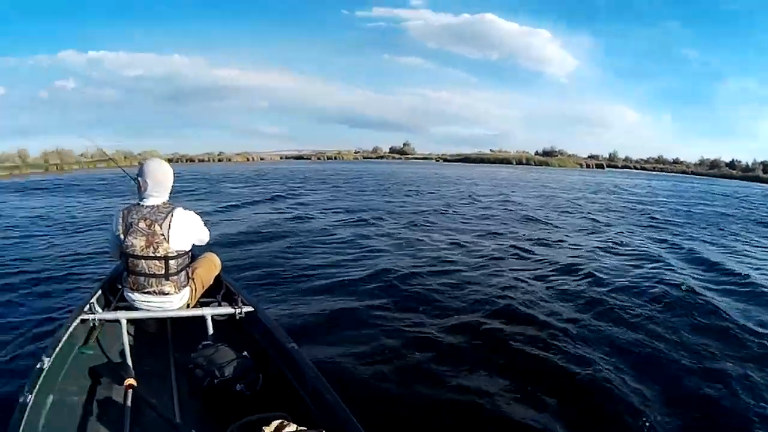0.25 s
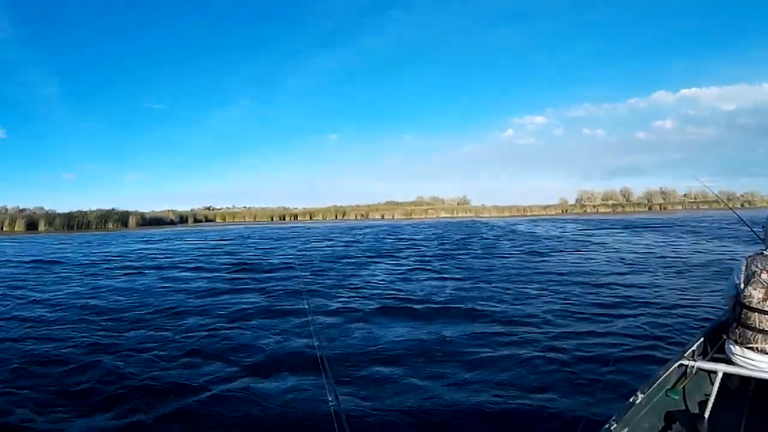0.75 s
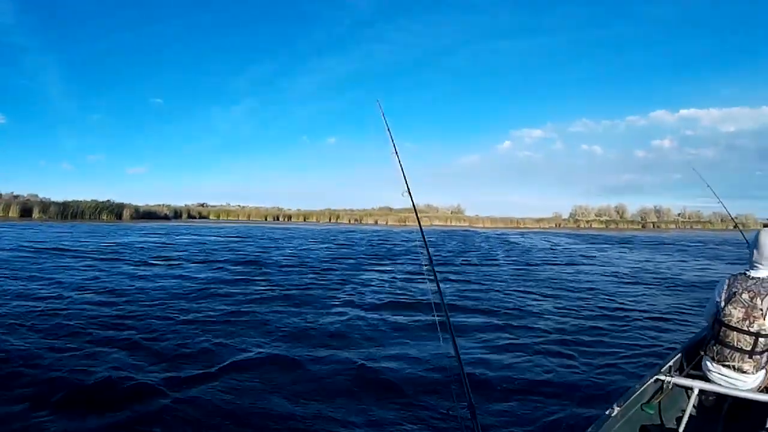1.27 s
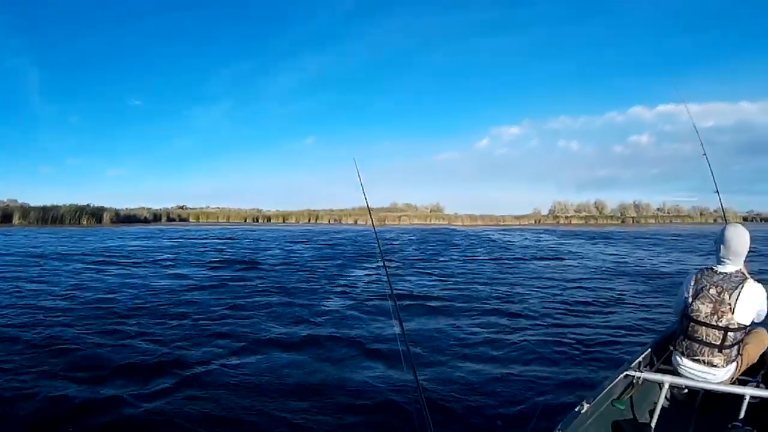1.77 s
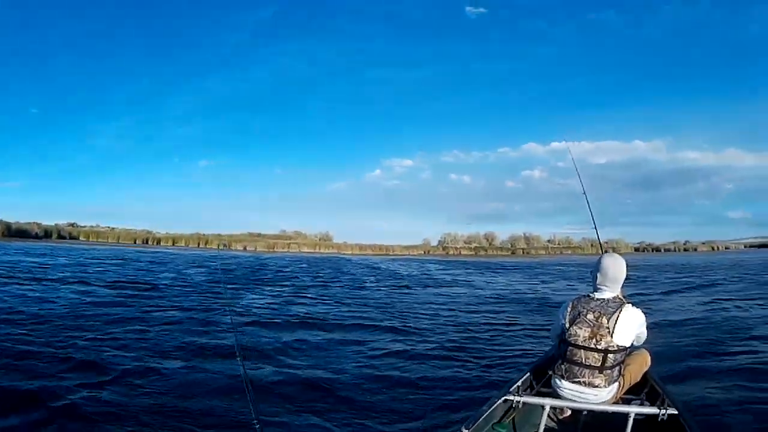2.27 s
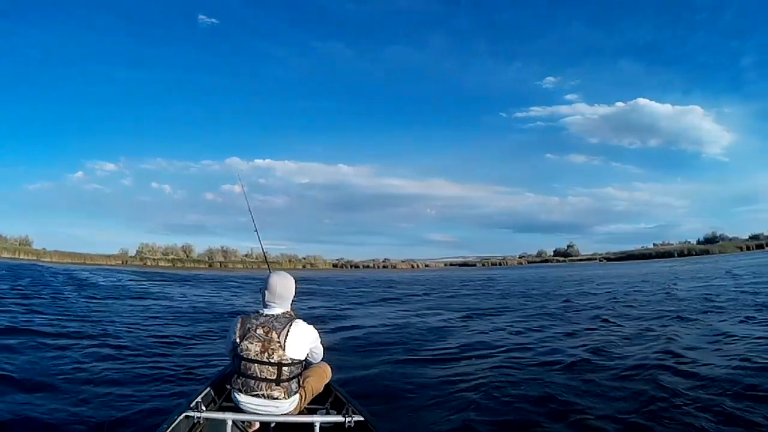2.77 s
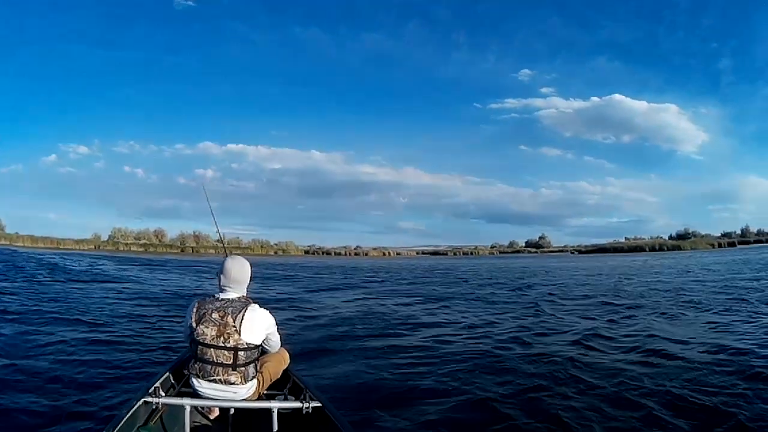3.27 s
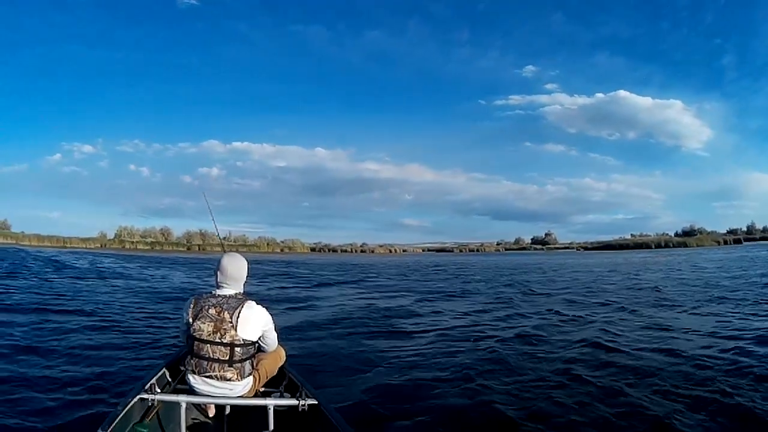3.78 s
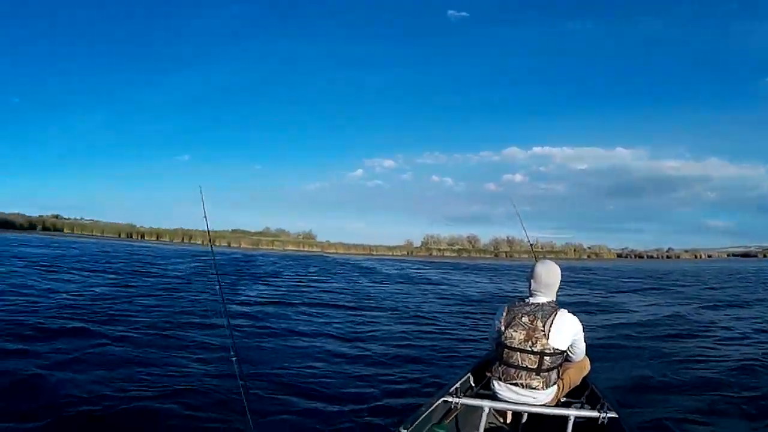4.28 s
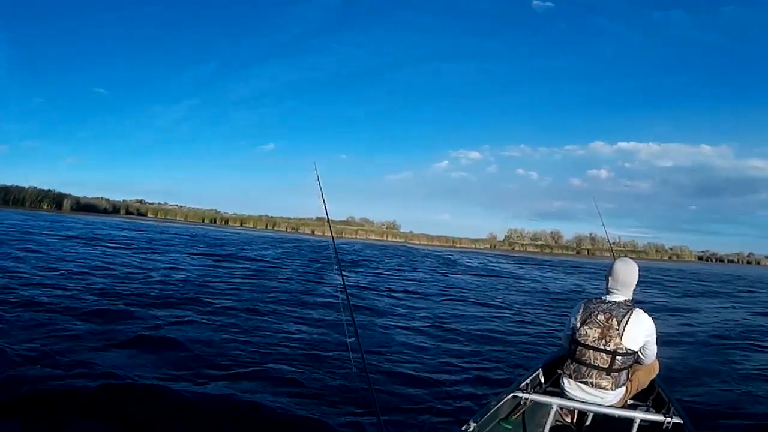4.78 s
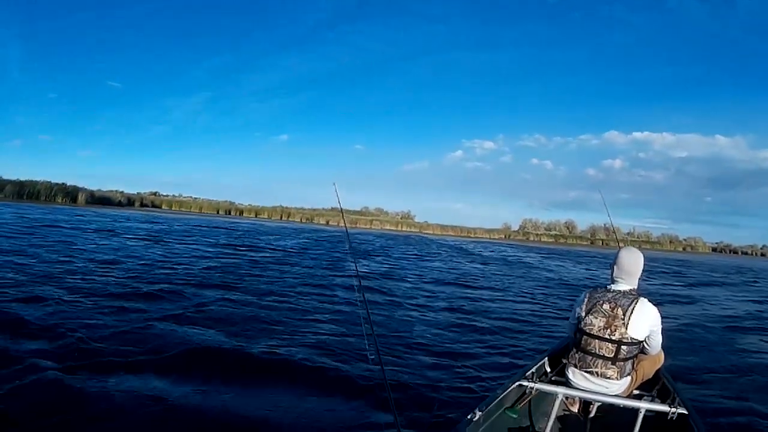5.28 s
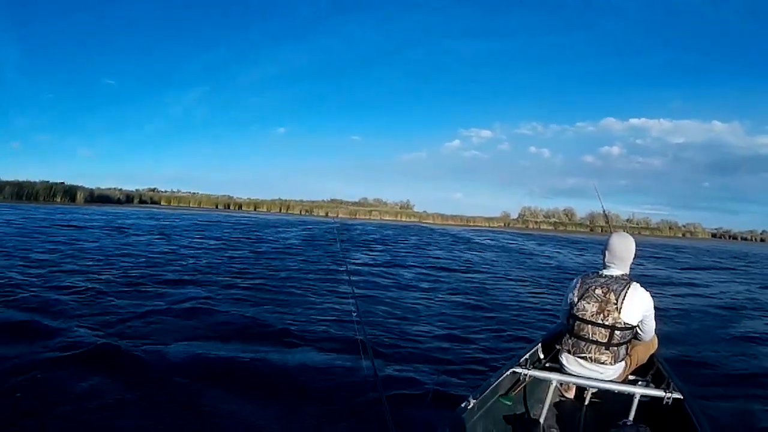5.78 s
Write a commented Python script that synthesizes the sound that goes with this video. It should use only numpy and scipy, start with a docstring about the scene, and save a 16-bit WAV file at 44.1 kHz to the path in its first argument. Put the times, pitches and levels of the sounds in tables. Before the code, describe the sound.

Close, mono wind noise on an exposed microphone over a lake. Mild airy rush first, then deep uneven buffeting with brief tearing spits on the strongest hits. About two seconds of much quieter soft wash and faint rumble follow, with one small puff early on. Another loud rush then arrives, fluttering and crackling before weakening slightly, with no echo.

```python
"""Wind on a body-worn camera in a small boat on open water. After a weak start a long gust hits the
microphone port: eddies thump and flutter on it (pulses, noise in octave layers) and the strongest
tear into crackle (decaying noise spits). In the lull a low rumble and the smoother rush of air and
choppy water (filtered random kicks) remain. A second long gust follows, easing toward the end.
Faint hiss runs throughout; the recorder rounds the highest peaks."""
import sys
import numpy as np
from scipy import signal
from scipy.fft import rfft, irfft
from scipy.io import wavfile
from scipy.ndimage import uniform_filter1d

SR = 44100
rng = np.random.default_rng(int(sys.argv[2]) if len(sys.argv) > 2 else 0)


def digitize_waveform(pressure):
    """Quantize a signal to 16-bit integers and store it at the path in sys.argv[1].

    Rows of a 2-D input are taken as channels; values are limited to [-1, 1].
    """
    field = np.atleast_2d(pressure).T
    bounded = np.clip(field, -1, 1)
    quanta = np.round(bounded * 32767).astype(np.int16)
    wavfile.write(sys.argv[1], SR, quanta)


N = 266364
TIME = np.arange(N) / SR
FREQ = np.fft.rfftfreq(N, 1 / SR) + 1e-3  # offset keeps log and division finite at 0 Hz
FULL_GUST_DB = -18  # wind strength that counts as a full gust


def undb(db):
    """Decibels to gain."""
    return 10 ** (np.asarray(db) / 20)


def curves(table):
    """Each value column of a table, interpolated over time."""
    t_s, *columns = np.transpose(table)
    return [np.interp(TIME, t_s, column) for column in columns]


def unit(x):
    """Scale to rms 1."""
    return x / np.sqrt(np.mean(x ** 2))


def colour(x, points):
    """Filter by a spectrum of (Hz, relative dB) points; white noise keeps its rms."""
    hz, db = np.transpose(points)
    gain = undb(np.interp(np.log(FREQ), np.log(hz), db))
    return irfft(rfft(x) * unit(gain), N)


def walk(rate_hz):
    """Random levels, one per 1 / rate_hz, joined by linear slews; rms 1."""
    hold = max(int(SR / rate_hz), 2)
    levels = rng.standard_normal(N)[:N // hold + 1]
    return unit(uniform_filter1d(np.repeat(levels, hold), hold)[:N])


def eddies(per_s):
    """Pressure kicks of random size and sign at random moments; rms 1."""
    struck = rng.random(N) < per_s / SR
    return unit(rng.standard_normal(N) * struck)


# wind strength at the port, two gusts and a lull: t/s, level/dB (relative)
GUST_STRENGTH = [(0, -29), (0.38, -32), (0.62, -19), (0.8, -16.5), (1.15, -15.5), (1.38, -18), (1.62, -18),
                 (1.92, -26), (2.25, -32), (2.6, -35.5), (3.3, -36), (3.9, -36.5), (4.26, -29.5),
                 (4.5, -21.5), (4.95, -18), (5.2, -16), (5.55, -19.5), (5.78, -21), (6.04, -22)]
# short puffs (+) and gaps (-): t/s at the middle, length/s, lift/dB
WIND_PUFFS = [(1.348, 0.071, 2.5), (1.714, 0.095, -2.5), (1.803, 0.14, 4.5), (2.39, 0.21, 4.5),
              (4.659, 0.16, 5), (5.249, 0.03, -11.5), (5.336, 0.06, 3.5), (5.914, 0.23, 2)]


def wind(surge_db=1.07, surges_per_s=9):
    """Wind strength in dB: slow gusts, puffs that swell and fade on them, random surges."""
    gust_db, = curves(GUST_STRENGTH)
    for mid_s, length_s, lift_db in WIND_PUFFS:
        phase = np.clip((TIME - mid_s) / length_s, -.5, .5)
        gust_db = gust_db + lift_db * np.cos(np.pi * phase)
    return gust_db + surge_db * walk(surges_per_s)


# drive of the largest eddies: t/s, level/dB (relative)
RUMBLE_DRIVE = [(0, -33.5), (0.35, -33), (0.75, -21.5), (1.2, -19.5), (1.8, -27), (2.1, -31.5), (2.7, -32),
                (3.1, -39), (3.8, -30.5), (4.45, -28.5), (5.2, -20), (6.04, -27)]
# pressure spectrum of a full gust: f/Hz, level/dB (per Hz, relative)
GUST_SPECTRUM = [(15, -31), (26, -9.5), (40, -1.5), (80, 0.5), (170, -0.5), (330, -3), (600, -10),
                 (1100, -18), (1550, -21), (2100, -35), (2700, -38.5), (3300, -58.5), (4300, -61.5),
                 (7000, -78)]


def buffet(gust_db, level_db=2.5, deep_db=5, steepen=0.097, flutter_db=1.16, burst_db=1.5,
           cascade=0.19, own_db=0.87):
    """Eddies of all sizes press on the port; small ones burst and grow fastest with the wind."""
    rumble_db, = curves(RUMBLE_DRIVE)
    pressure = rfft(colour(eddies(per_s=6000), GUST_SPECTRUM))
    churn_db = flutter_db * walk(55) + burst_db * walk(170)
    out = 0
    for octave in range(-4, 7):
        # triangular bands an octave apart, counted from 300 Hz
        place = np.log2(FREQ / 300) - octave
        layer = irfft(pressure * np.clip(1 - abs(place), 0, 1), N)
        # the largest eddies roll on by themselves, the smallest follow the gust steeply
        large = np.clip(-octave / 2, 0, 1)
        small = np.clip(octave, 0, 3)
        drive_db = gust_db + large * (rumble_db - gust_db + deep_db)
        drive_db = drive_db + steepen * small * (gust_db - FULL_GUST_DB)
        churn_share = 1 - large + cascade * small
        bursts = unit(undb(churn_db * churn_share + own_db * walk(30)))
        out = out + layer * undb(drive_db) * bursts
    return out * undb(level_db)


# strongest single eddies on the port: t/s, peak level/dB (relative), nominal f/Hz
THUMP_EVENTS = [(0.431, -4.5, 153), (0.451, -7, 130), (0.534, -7.5, 135), (0.582, 2.5, 157),
                (1.001, 4, 133), (1.106, 0, 132), (1.14, -1, 369), (1.249, -2.5, 191), (1.731, -2.5, 233),
                (1.763, 3.5, 280), (1.79, 2, 237), (2.378, -14, 145), (5.26, 0, 152), (5.323, 1, 157),
                (5.33, 4.5, 345), (5.396, 0.5, 202), (5.42, 1, 222)]


def thumps(level_db=-5.0, sharpness=3.27):
    """A large eddy sucks briefly at the diaphragm, with a push of pressure on either side."""
    out = np.zeros(N)
    for t_s, peak_db, hz in THUMP_EVENTS:
        near = abs(TIME - t_s) < 2 / hz
        distance_sq = (sharpness * hz * (TIME[near] - t_s)) ** 2
        out[near] -= undb(peak_db + level_db) * (1 - 2 * distance_sq) * np.exp(-distance_sq)
    return out


# loudest spits of flow tearing off the port edge: t/s, onset level/dB (relative)
SPIT_EVENTS = [(0.992, -28), (1.0415, -18), (1.072, -18.5), (1.129, -23), (1.1978, -16.5), (1.209, -19),
               (1.354, -23), (1.4052, -28), (1.8196, -22), (2.4085, -25.5), (4.9018, -22), (5.001, -26),
               (5.153, -22), (5.1948, -21), (5.2608, -21.5), (5.3222, -16), (5.463, -19), (5.6032, -30),
               (5.8695, -20.5), (5.919, -26)]
# crackle spectrum: f/Hz, level/dB (per Hz, relative)
CRACKLE_SPECTRUM = [(300, -3), (1500, 9), (2600, 2.5), (3300, -2), (4300, -4.5), (5600, -15.5),
                    (7000, -22.5), (9000, -32), (15000, -37.5)]


def crackle(gust_db, spit_db=-4, decay_s=0.0019, spray_db=-43.0, spread_db=7, cluster_db=3, growth=1.8):
    """Millisecond spits of fine turbulence over a spray of small ones that rises steeply with the gust."""
    spits = np.zeros(N)
    for t_s, onset_db in SPIT_EVENTS:
        spits[int(t_s * SR)] += undb(onset_db + spit_db)
    spits = signal.lfilter([1], [1, -np.exp(-1 / (decay_s * SR))], spits)
    grains_db = spread_db * np.minimum(walk(500), 2.5)
    spray = unit(undb(grains_db + cluster_db * walk(45)))
    over_full_db = np.minimum(gust_db - FULL_GUST_DB, 1)  # capped 1 dB above a full gust
    spray = spray * undb(spray_db + growth * over_full_db)
    return colour((spits + spray) * rng.standard_normal(N), CRACKLE_SPECTRUM)


# air and chop around the boat: t/s, level/dB (relative)
RUSH_LEVEL = [(0, -41), (0.17, -41), (0.3, -46.5), (0.5, -49.5), (0.75, -59.5), (1.8, -65), (2.02, -51),
              (2.27, -56), (2.64, -48.5), (2.8, -44.5), (2.92, -50.5), (3.4, -49.5), (3.62, -46),
              (3.88, -49), (4.02, -44.5), (4.25, -50), (4.7, -46.5), (5.2, -61), (6.04, -54)]
# rush spectrum: f/Hz, level/dB (per Hz, relative)
RUSH_SPECTRUM = [(100, -32), (400, -8), (900, -5), (1250, -10.5), (1650, -9), (2150, -16), (2700, -18),
                 (3300, -29.5), (4400, -27.5), (5700, -40.5), (6700, -42), (8000, -55.5), (15000, -70)]


def rush(level_db=12, flicker_db=1.16, grain_db=1.54, brighten=0.25, treble_hz=3000, usual_db=-50):
    """A smooth wash of air and small waves, slightly grainy and brighter as it swells."""
    rush_db, = curves(RUSH_LEVEL)
    wash = colour(eddies(per_s=9000), RUSH_SPECTRUM)
    treble = irfft(rfft(wash) / (1 + (treble_hz / FREQ) ** 2), N)
    wash = wash + treble * (undb(brighten * (rush_db - usual_db)) - 1)
    unsteady_db = flicker_db * walk(22) + grain_db * walk(150)
    return wash * undb(rush_db + level_db + unsteady_db)


def hiss(level_db=-64.5):
    """The microphone's own steady noise, tilted toward the treble."""
    noise = colour(rng.standard_normal(N), [(1000, -7.5), (8000, 3.5), (15000, 0.5)])
    return undb(level_db) * noise


def scene():
    """Wind on the port over the rush and the microphone's own hiss; one channel."""
    gust_db = wind()
    mix = buffet(gust_db) + thumps() + crackle(gust_db) + rush() + hiss()
    return mix[None]


def record(dry, ceiling=.715, knee=8, top_hz=15500):
    """The recorder rounds peaks against its ceiling and cuts the top."""
    rounded = dry / (1 + abs(dry / ceiling) ** knee) ** (1 / knee)
    low_pass = signal.ellip(12, .2, 80, top_hz, fs=SR, output="sos")
    return signal.sosfilt(low_pass, rounded)


dry = scene()
out = record(dry)
digitize_waveform(out)
```